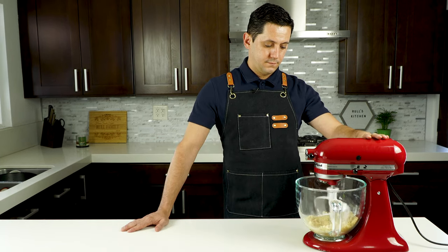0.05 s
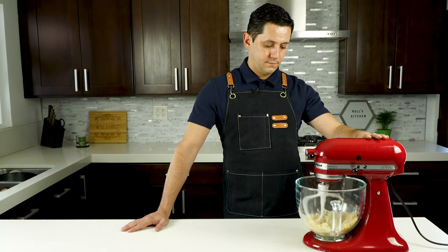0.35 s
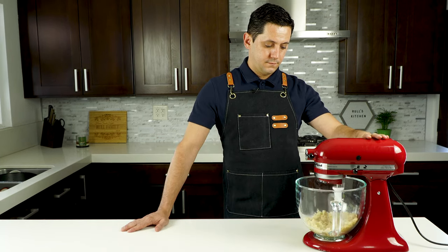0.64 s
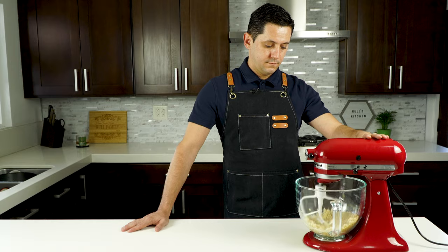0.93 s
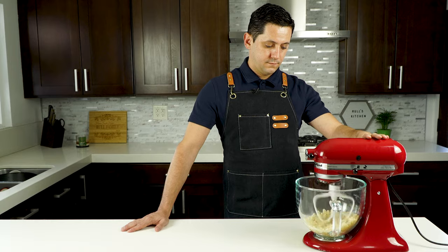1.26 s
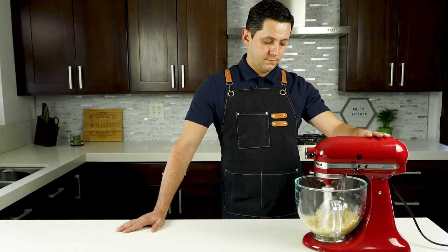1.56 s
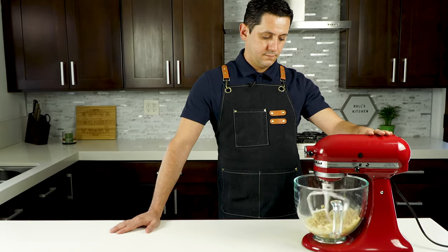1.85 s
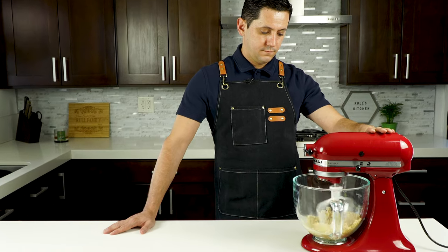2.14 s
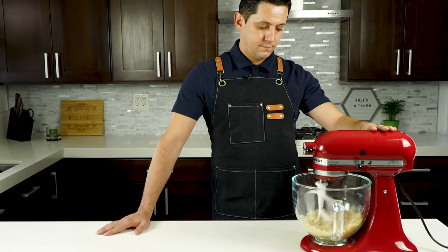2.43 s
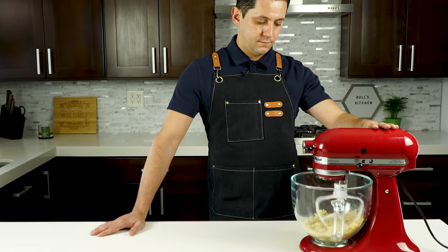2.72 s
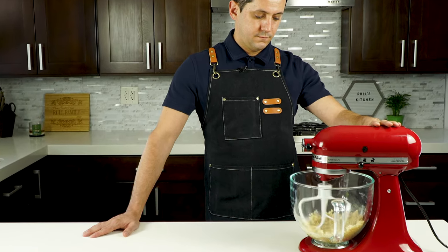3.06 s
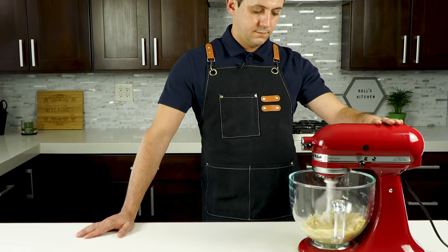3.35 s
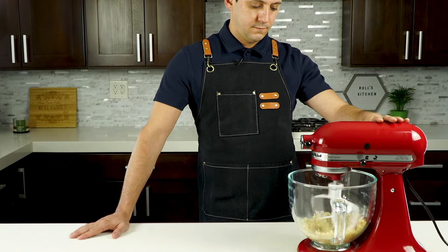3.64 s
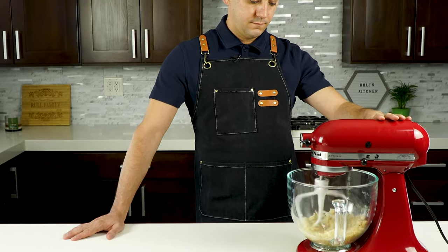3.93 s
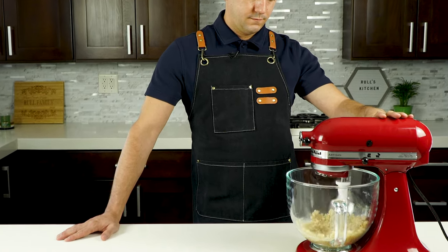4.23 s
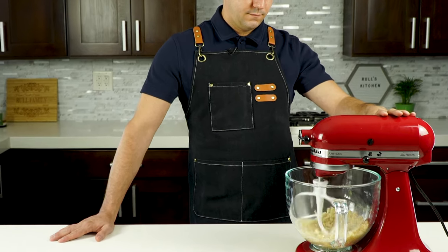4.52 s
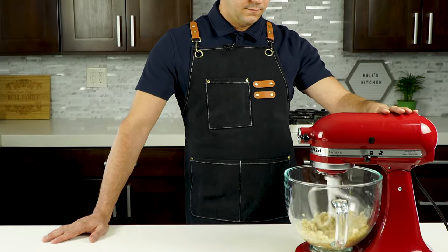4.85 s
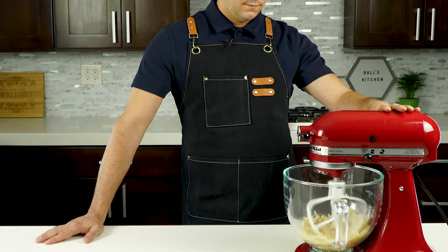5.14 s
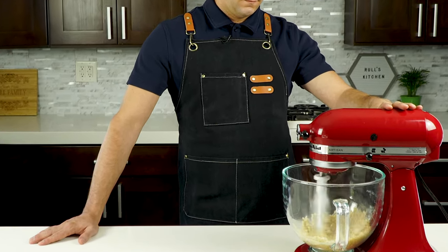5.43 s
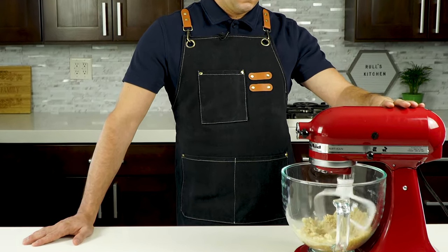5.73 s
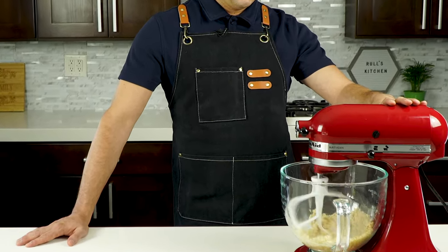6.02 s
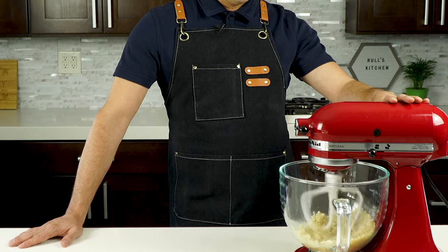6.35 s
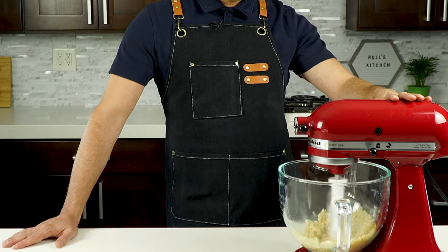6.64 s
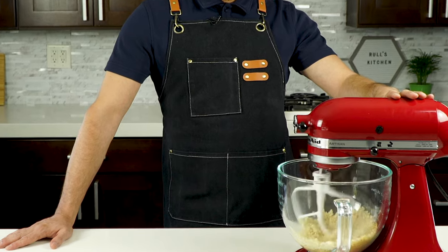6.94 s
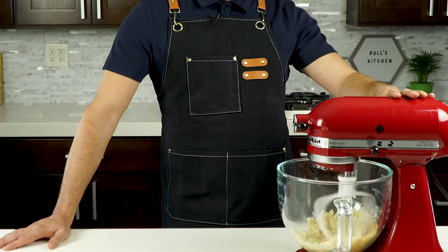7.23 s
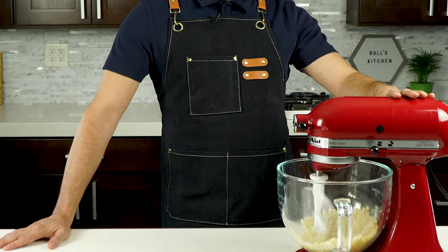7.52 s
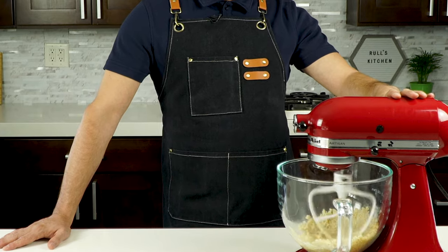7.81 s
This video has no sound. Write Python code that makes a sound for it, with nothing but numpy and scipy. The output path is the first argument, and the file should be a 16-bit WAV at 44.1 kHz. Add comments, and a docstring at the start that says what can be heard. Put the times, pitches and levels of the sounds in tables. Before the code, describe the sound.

A stand mixer runs steadily on a kitchen counter, its motor giving a high whine and a bright hiss. The gears chatter, and the beater knocks lightly about twice a second as it churns soft dough in a glass bowl. A few crumbs tick faintly on the glass. The microphone edges closer, and at the very end the speed lever clicks sharply as the motor just starts to slow.

```python
"""On a kitchen counter, a stand mixer creams soft dough in a glass bowl, heard in mono from a spot
that edges closer. The motor's fan and spinning contacts whine, its brushes hiss and its vents blow air.
The gears chatter, the dough churns and the counter rumbles. The beater knocks the gears as it hits
the dough, and a few crumbs tick on the glass. At the very end the speed lever clicks and the motor
starts to slow."""
import sys
import numpy as np
from scipy import signal
from scipy.fft import rfft, irfft
from scipy.io import wavfile
from scipy.ndimage import uniform_filter1d, map_coordinates

SR = 44100
rng = np.random.default_rng(int(sys.argv[2]) if len(sys.argv) > 2 else 0)


def store_pcm(level_fs):
    """Save levels as 16-bit WAV."""
    pcm = np.round(np.clip(level_fs, -1, 1) * 32767).astype(np.int16)
    wavfile.write(sys.argv[1], SR, np.atleast_2d(pcm).T)


N = 347508
TIME = np.arange(N) / SR
FAN_BLADES, BARS = 10, 22  # bars: the spinning contacts that the motor's brushes rub on
RIPPLE_HZ = 120  # pulse rate of the mains current
# shaft turns per orbit (one trip of the beater round the bowl) and per sweep of its edge along the glass
ORBIT_TURNS, SWEEP_TURNS = 47.8, 14.53

# how the motor's two hisses drift: time_s, brushes_db, air_db
HISS_LEVELS = [(0, -49.5, -71.5), (.8, -49.5, -72.5), (1.3, -48.5, -73.5), (2.2, -48, -74.5),
               (3.1, -48, -77), (4.3, -48, -78), (6.2, -48.5, -80.5), (7.4, -49.5, -82), (7.88, -49, -81)]
# slow change of the load as the dough loosens: time_s, gears_db, dough_db
LOAD_LEVELS = [(0, -58.3, -69), (.7, -57.5, -70), (1.2, -58, -70.5), (1.8, -60, -74), (2.6, -58.5, -70.5),
               (3.8, -59.5, -70.5), (4.9, -59.5, -69.5), (5.8, -59.8, -71), (6.8, -60.2, -69.5),
               (7.88, -60, -71)]
# the speed lever scrapes over its notch and snaps in: start_s, peak_db
LEVER_CLICKS = [(7.8386, -24.5), (7.8396, -21), (7.8420, -28)]


def undb(db):
    """Turn decibels into a gain."""
    return 10 ** (np.asarray(db) / 20)


def curves(table):
    """Join a table's timed rows with straight lines: one curve per column after the time."""
    times, *columns = np.transpose(table)
    return [np.interp(TIME, times, column) for column in columns]


def wander(rate_hz):
    """A smooth random wobble around zero, about 1 in size."""
    hold = max(int(SR / rate_hz), 2)
    steps = np.repeat(rng.standard_normal(N // hold + 1), hold)
    return 1.322 * uniform_filter1d(uniform_filter1d(steps, hold), hold)[:N]


def swell(cycles, peak_at):
    """A swing between -1 and 1 that peaks at the given place (0-1) in each cycle."""
    return np.cos(2 * np.pi * (cycles - peak_at))


def body(spectrum, resonances=(), size=8192):
    """How an object answers one sharp tap, given its smooth spectrum and its humps and dips."""
    freqs = np.maximum(np.fft.rfftfreq(size, 1 / SR), 1)
    hz, db = np.transpose(spectrum)
    db = np.interp(np.log(freqs), np.log(hz), db)
    db -= 40 * np.log10(np.maximum(freqs / hz[-1], 1))  # fade above the last point
    for centre, width, lift in resonances:
        db += lift / (1 + (2 * (freqs - centre) / width) ** 2)
    # folding the cepstrum puts all the ringing after the tap
    cepstrum = irfft(np.log(undb(db)))
    cepstrum[1:size // 2] *= 2
    cepstrum[size // 2 + 1:] = 0
    return irfft(np.exp(rfft(cepstrum)))


def ring(drive, response):
    """Let a signal set an object or a room ringing."""
    return signal.fftconvolve(drive, response)[:N]


def unit(sound, band_hz=(0, SR / 2)):
    """Scale a sound so that its average strength (rms) within a band is 1."""
    freqs = np.fft.rfftfreq(N, 1 / SR)
    inside = rfft(sound)[(freqs >= band_hz[0]) & (freqs <= band_hz[1])]
    return sound * N / np.sqrt(2 * np.sum(abs(inside) ** 2))


def grains(per_s, spread_db):
    """Tiny random impacts of uneven size."""
    sizes = undb(spread_db * np.minimum(rng.exponential(size=N), 4))
    return unit((rng.random(N) < per_s / SR) * sizes * rng.choice([-1, 1], N))


def tail(fade_s, size=16384):
    """Dense echoes that build up in a few milliseconds and drop 60 dB in fade_s."""
    t = TIME[:size]
    onset = 1 - np.exp(-(t / 0.0033) ** 2)
    echoes = rng.standard_normal(size) * onset * undb(-60 * t / fade_s)
    return echoes / np.sqrt(np.sum(echoes ** 2))


def add(out, start_s, sound):
    """Mix a sound in at a given time."""
    start = min(int(start_s * SR), N)
    out[start:start + len(sound)] += sound[:N - start]


def tone(cycles, waver_db):
    """A pure tone whose level wavers at random."""
    return np.sqrt(2) * np.sin(2 * np.pi * (cycles + rng.random())) * undb(waver_db * wander(7))


def mains(depth, overtone, lag=0):
    """The motor current swells twice in each cycle of the mains supply."""
    angle = 2 * np.pi * (RIPPLE_HZ * TIME + lag)
    return 1 + depth * (np.cos(angle) + overtone * np.sin(2 * angle))


def shaft_speed():
    """Turns per second: the motor sags once an orbit in thick dough and coasts after the lever clicks."""
    # the speed that the motor's governor holds: time_s, speed_hz
    held_speeds = [(0.0, 93.05), (0.2, 92.34), (0.56, 92.6), (0.68, 92.12), (1.04, 92.26), (1.16, 91.88),
                   (1.76, 91.82), (3.2, 94.62), (3.8, 94.67), (3.92, 94.98), (4.4, 95.04), (4.76, 94.08),
                   (5.48, 94.65), (5.84, 95.49), (6.8, 94.4), (7.4, 93.78), (7.64, 94.58), (7.88, 93.59)]
    held_hz, = curves(held_speeds)
    orbits = np.cumsum(held_hz) / SR / ORBIT_TURNS
    sag_hz = 0.168 * swell(orbits, peak_at=0.606)
    coasting = np.exp(-np.maximum(TIME - LEVER_CLICKS[-1][0], 0) / 0.98)
    return (held_hz - sag_hz) * (1 + 0.0005 * wander(30)) * coasting


def fan_whine(shaft_hz, turns, orbits, near):
    """The fan blades sing one tone, which swells as the beater circles."""
    # the housing favours some pitches of the fan: pitch_hz, level_db
    fan_levels = [(917, -77), (920, -66), (925, -62.5), (931, -62.5), (937, -65.5), (941, -61), (946, -58),
                  (955, -57.5)]
    level_db = np.interp(FAN_BLADES * shaft_hz, *np.transpose(fan_levels))
    level_db += 0.7 * swell(orbits, peak_at=0.12) - 2.5 * (1 - near)
    return tone(FAN_BLADES * turns, waver_db=0.4) * undb(level_db)


def bar_whine(turns, orbits):
    """The bars sing as they pass the brushes; the pulsing current adds tones on either side."""
    # the bar tone and its overtones: time_s, main_db, second_db, fourth_db, sixth_db
    bar_levels = [(0, -68, -65.5, -59, -70), (.9, -67, -62.5, -60, -64), (2.15, -70, -64.5, -58.5, -67),
                  (2.5, -68.5, -63.5, -59, -74), (3.2, -68, -64, -60.5, -63), (3.75, -71, -66, -64.5, -69),
                  (4.35, -75, -64, -61.5, -67), (4.8, -72.5, -64, -71, -68.5), (5.4, -78, -66.5, -63, -72),
                  (5.9, -77, -67, -61, -76), (6.4, -77.5, -64.5, -60, -68), (7.25, -80.5, -66, -65, -73),
                  (7.88, -79, -64, -62, -71)]
    # the bar tone and its side tones: ripple_steps, offset_db, fade_share (0-1)
    side_tones = [(-2, -4, 0.53), (-1, -6, 0.94), (0, 0, 1), (1, -8, 0.95), (2, -15, .9)]
    main_db, second_db, fourth_db, sixth_db = curves(bar_levels)
    fade_db = main_db - main_db[0]
    circling_db = main_db[0] + 1.2 * swell(2 * orbits, peak_at=0.52) + 1.2 * wander(12)
    out = np.zeros(N)
    for steps, offset_db, fade_share in side_tones:
        cycles = BARS * turns + round(steps) * RIPPLE_HZ * TIME
        out += tone(cycles, waver_db=2.1) * undb(offset_db + circling_db + fade_share * fade_db)
    second_db += 1.2 * swell(orbits, peak_at=0.26)
    for multiple, level_db in ((2, second_db), (4, fourth_db), (6, sixth_db)):
        overtone = tone(multiple * BARS * turns, waver_db=1.45) * undb(level_db)
        out += overtone * mains(depth=0.26, overtone=0.6, lag=rng.random())
    return out


def uneven_whine(turns, near):
    """Uneven bars add thin tones at other multiples of the shaft speed."""
    # the extra tones: shaft_multiple, far_db, near_db, ripple_depth (0-1)
    extra_tones = [(9, -75, -86, .1), (15, -94, -85, .1), (32, -92, -90, .1), (35, -90, -88, .1),
                   (38, -83, -88, .2), (41, -79, -79, .2), (43, -71.5, -77, .3), (45, -76, -79, .3),
                   (51, -80, -88, .2), (53, -73, -81, .2), (54, -70.5, -71, .2), (55, -78, -78, .2),
                   (56, -75, -82, .2), (60, -78, -76, .2), (62, -77, -77, .2), (65, -64.5, -70, .25),
                   (66, -64.5, -60, .25), (68, -65.5, -73, .3), (73, -75, -74, .2), (76, -73, -80, .3),
                   (84, -74, -65.5, .2), (100, -77, -74, .3), (109, -77, -68, .3), (110, -71, -66, .3),
                   (116, -75, -75, .3), (119, -80, -77, .2), (128, -85, -73, .3), (154, -80, -82, .3)]
    out = np.zeros(N)
    for multiple, far_db, near_db, depth in extra_tones:
        thin_tone = tone(multiple * turns, waver_db=2.0) * undb(far_db + near * (near_db - far_db))
        # each tone leaves the housing with its own delay
        out += thin_tone * mains(depth, overtone=0.51, lag=rng.random())
    return out


def sparks(turns, spread_db):
    """Each bar sparks as it leaves a brush: a sudden burst of hiss that dies away."""
    decay_s = 0.0025
    leaving = np.diff(np.floor(BARS * turns), prepend=0)
    strength = leaving * undb(spread_db * np.clip(rng.standard_normal(N), -2, 2))
    energy = signal.lfilter([1], [1, -np.exp(-2 / (decay_s * SR))], strength ** 2)
    return unit(np.sqrt(energy) * rng.standard_normal(N))


def brushes(turns, size=512):
    """Carbon brushes scrape and spark, pulsing with the current and each turn, and ring the housing."""
    # tone colour of the brush hiss: pitch_hz, level_db
    hiss_spectrum = [(2600, -48.5), (3500, -21.5), (4200, -8.5), (5400, -5.5), (7000, -1), (8900, -4.5),
                     (10500, 0), (13000, -3.5), (14500, -7.5), (15600, -12)]
    # humps and dips of the motor housing: pitch_hz, width_hz, lift_db
    housing_rings = [(4052, 206, 10), (6267, 540, 10), (6450, 130, -2.5), (7000, 270, 2), (7400, 490, -2.5),
                     (8050, 780, 6.5), (8830, 400, -3.5), (9470, 400, 5.5), (9770, 160, -7.5),
                     (10200, 890, 3), (10950, 170, 1), (11580, 300, -4.5), (12300, 790, 3.5),
                     (12660, 120, -4), (13980, 210, 3)]
    hiss_db, _ = curves(HISS_LEVELS)
    # the same scratches pass under the brush on every turn
    scratches = map_coordinates(rng.standard_normal(size), [turns % 1 * size], order=3, mode="grid-wrap")
    friction = sparks(turns, spread_db=2.0) + undb(-10.5) * scratches
    friction += undb(-5.5) * grains(per_s=3000, spread_db=1.5)
    lopsided = 1 + 0.03 * np.cos(2 * np.pi * turns)
    bouncing = 1 + 0.081 * np.cos(2 * np.pi * 7 * turns)  # seven bounces a turn
    drive = friction * mains(depth=0.018, overtone=0.88) * lopsided * bouncing
    hiss = ring(drive, body(hiss_spectrum, housing_rings))
    return unit(hiss, band_hz=(5000, 15000)) * undb(hiss_db - 1.5)


def cooling_air():
    """The fan blows air through the vents of the motor head."""
    # tone colour of the rushing air: pitch_hz, level_db
    air_spectrum = [(500, -10.5), (1300, -3), (1550, 0.5), (1750, 2.5), (2200, 0.5), (2500, -10.5),
                    (3000, -6), (3600, -1), (5000, -22), (9000, -31.5)]
    _, air_db = curves(HISS_LEVELS)
    flow = rng.standard_normal(N) * mains(depth=0.1, overtone=0.14) * undb(1.3 * wander(15))
    return unit(ring(flow, body(air_spectrum)), band_hz=(2450, 3400)) * undb(air_db - 0.17)


def gear_chatter(turns, strain, near):
    """Loose teeth tap the gear case, which rings near 1000 Hz, louder when the gears strain."""
    # tone colour of the gear case: pitch_hz, level_db
    case_spectrum = [(450, -39), (690, -17.5), (800, -11.5), (900, -12), (990, 2.5), (1130, 3.5),
                     (1190, -7), (1270, -23), (1450, -32), (2200, -46.5)]
    # the side of the case, heard mostly from afar: pitch_hz, level_db
    side_spectrum = [(250, -36.5), (345, -4), (400, -11), (520, -28), (690, -22), (790, 1), (880, -1),
                     (1000, -1), (1250, -7.5), (1500, -23.5), (2500, -45.5)]
    load_db, _ = curves(LOAD_LEVELS)
    bite = swell(turns / SWEEP_TURNS, peak_at=0.91)  # the beater's edge bites once a sweep
    gear_db = load_db + 0.8 * strain + 0.4 * bite + 0.78 * wander(20)
    taps = grains(per_s=520, spread_db=0.8) + undb(-5) * rng.standard_normal(N)
    taps *= undb(0.62 * wander(25))
    case = unit(ring(taps, body(case_spectrum)), band_hz=(1000, 1250))
    side = unit(ring(grains(per_s=700, spread_db=2.0), body(side_spectrum)))
    return case * undb(gear_db - 0.5) + side * undb(gear_db - 7.5 - 10 * near)


def dough_churn(squash):
    """The beater squashes dough against the bowl, which rings low."""
    # tone colour of the squashed dough: pitch_hz, level_db
    dough_spectrum = [(170, -13), (290, -12.5), (340, -3), (390, -4.5), (445, -2.5), (520, -8), (640, -8),
                      (900, -13.5), (2000, -40.5)]
    # humps and dips of the bowl: pitch_hz, width_hz, lift_db
    bowl_rings = [(354, 39, 6), (420, 66, 1.5), (300, 28, -3), (546, 88, -0.5), (245, 30, 6.5)]
    _, load_db = curves(LOAD_LEVELS)
    dough_db = load_db + 1.7 * squash + 1.4 * wander(20)  # the dough lies differently on every pass
    squelches = grains(per_s=400, spread_db=3.0) + undb(-3.5) * rng.standard_normal(N)
    churn = ring(squelches, body(dough_spectrum, bowl_rings))
    return unit(churn, band_hz=(300, 500)) * undb(dough_db - 0.55)


def counter_rumble(squash):
    """The stand shakes the counter, a little harder when the dough is squashed."""
    # tone colour of the counter: pitch_hz, level_db
    counter_spectrum = [(20, -11), (32, -24), (48, -5), (63, -1.5), (115, 2), (170, -3.5), (220, -12),
                        (330, -10), (700, -42.5)]
    level_db = -71.8 + 0.7 * squash + wander(12)
    shaking = grains(per_s=250, spread_db=1.0) + undb(-5) * rng.standard_normal(N)
    return unit(ring(shaking, body(counter_spectrum))) * undb(level_db)


def gear_knocks(strain, near):
    """The beater hits the dough and the slack in the gears snaps shut: a thump, then a short rattle."""
    # hits on the lump of dough: start_s, peak_db
    hits = [(0.133, -38), (0.607, -38), (0.774, -44), (1.087, -36), (1.242, -41), (1.394, -40.5),
            (1.710, -40.5), (2.184, -38.5), (2.345, -47), (2.657, -43.5), (2.800, -42), (3.271, -41.5),
            (3.424, -43), (3.726, -42.5), (3.888, -41.5), (4.342, -45), (4.782, -46.5), (4.960, -44),
            (5.260, -43), (5.414, -42.5), (5.718, -37.5), (5.875, -38.5), (6.173, -41.5), (6.327, -40.5),
            (6.639, -43), (6.785, -42.5), (6.946, -43.5), (7.248, -43.5), (7.407, -44), (7.712, -43),
            (7.872, -36.5)]
    # tone colour of the thumped gear case: pitch_hz, level_db
    thump_spectrum = [(150, -33.5), (400, -22), (620, -17.5), (800, -1.5), (1080, 4), (1230, -5.5),
                      (1400, -14.5), (1750, -24.5), (2100, -31), (3000, -43), (8000, -61)]
    out = np.zeros(N)
    for start_s, peak_db in hits:
        upper_ring_db = 4 - 8.5 * np.interp(start_s, TIME, near)  # stronger from afar
        thump = body(thump_spectrum, [(1400, 230, upper_ring_db)])
        thump *= undb(peak_db) / abs(thump).max()
        add(out, start_s, thump)
        rattle_db = -2 + 1.5 * np.interp(start_s, TIME, strain)
        rattle = signal.fftconvolve(thump, tail(fade_s=0.18))
        add(out, start_s + 0.001026, undb(rattle_db) * rattle)
    return out


def crumb_ticks():
    """Crumbs flung off the beater tick against the glass bowl."""
    # crumbs landing: time_s, peak_db
    landings = [(.27, -50), (.737, -45), (5.306, -46)]
    # tone colour of the glass: pitch_hz, level_db
    glass_spectrum = [(1500, -30), (3300, -8), (4300, -1), (5100, 2), (6200, -8), (10000, -22)]
    out = np.zeros(N)
    for time_s, peak_db in landings:
        tick = signal.fftconvolve(tail(fade_s=0.036), body(glass_spectrum))
        add(out, time_s - 0.003, undb(peak_db) * tick / abs(tick).max())
    return out


def speed_lever():
    """The metal lever snaps over its notch, its plate rings on and the kitchen echoes."""
    # tone colour of a click: pitch_hz, level_db
    click_spectrum = [(900, -53), (1650, -11.5), (2500, -26), (3400, -11), (5000, -15), (6500, -7.5),
                      (8300, -4), (10500, -13), (13000, -10), (16000, -15)]
    # ringing pitches of the lever: pitch_hz, width_hz, lift_db
    lever_rings = [(5800, 240, 12), (6590, 240, 9.4), (7550, 320, 9.6), (8670, 360, 8.3), (10500, 350, 3.9)]
    out = np.zeros(N)
    for start_s, peak_db in LEVER_CLICKS:
        contact = rng.standard_normal(N) * np.exp(-TIME / 0.0016)
        click = ring(contact, body(click_spectrum, lever_rings))
        add(out, start_s, undb(peak_db) * click / abs(click).max())
    plate_hz, plate_fade_s, plate_db = 1630, 0.09, -54
    plate = np.sin(2 * np.pi * plate_hz * TIME) * undb(plate_db - 60 * TIME / plate_fade_s)
    add(out, LEVER_CLICKS[1][0], plate)
    return out + undb(-7.5) * ring(out, tail(fade_s=0.19))


def scene():
    """One shaft drives the motor sounds and the circling beater; both ears hear the same."""
    # the listening spot edges closer: time_s, nearness (0 far, 1 near)
    approach = [(0, 0), (2.0, 0.041), (3.2, 1), (7.88, 0.96)]
    near, = curves(approach)
    shaft_hz = shaft_speed()
    turns = np.cumsum(shaft_hz) / SR
    orbits = turns / ORBIT_TURNS
    # in each orbit the gears strain most just before the dough is squashed most
    strain, squash = swell(orbits, peak_at=0.34), swell(orbits, peak_at=0.41)
    whine = fan_whine(shaft_hz, turns, orbits, near) + bar_whine(turns, orbits)
    motor = whine + uneven_whine(turns, near) + brushes(turns) + cooling_air()
    mixing = gear_chatter(turns, strain, near) + dough_churn(squash) + counter_rumble(squash)
    mono = motor + mixing + gear_knocks(strain, near) + crumb_ticks() + speed_lever()
    return np.array([mono, mono])


def record(dry):
    """Cut away the highest treble, above 15750 Hz."""
    return signal.sosfilt(signal.ellip(12, .1, 70, 15750, fs=SR, output="sos"), dry)


dry = scene()
out = record(dry)
store_pcm(out)
```